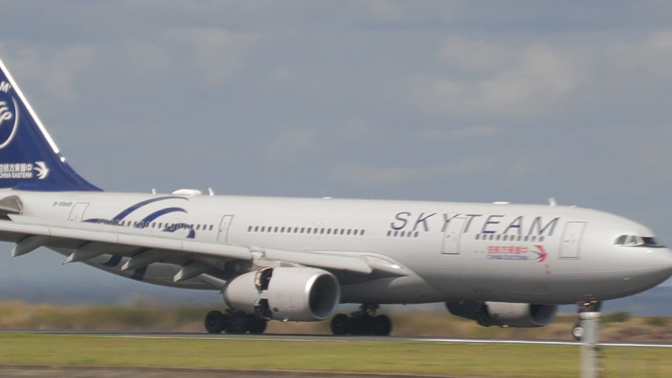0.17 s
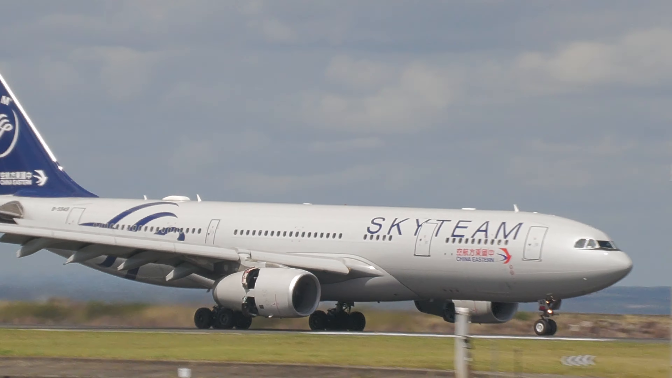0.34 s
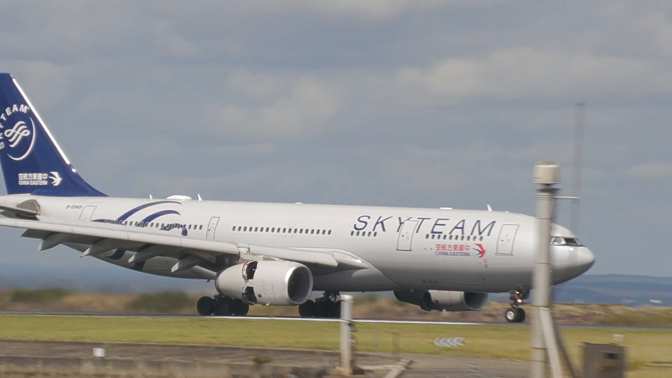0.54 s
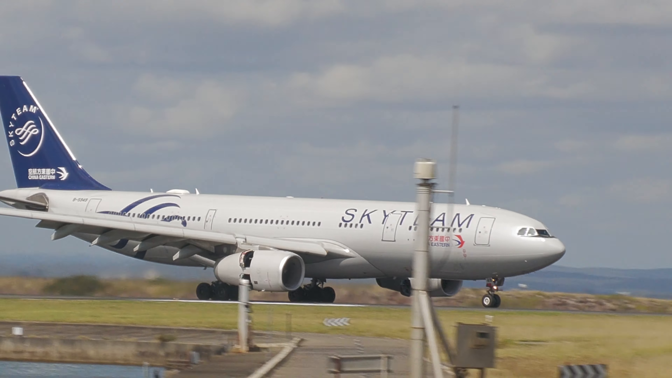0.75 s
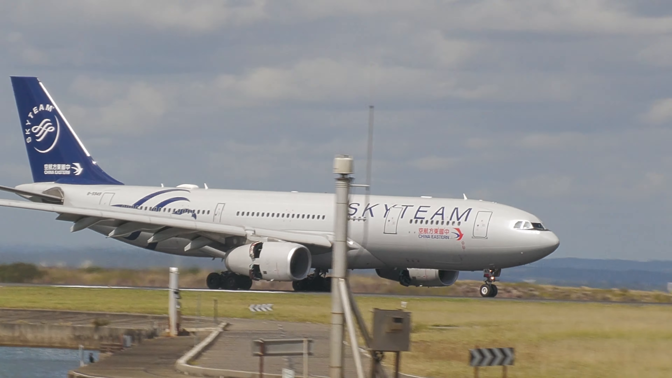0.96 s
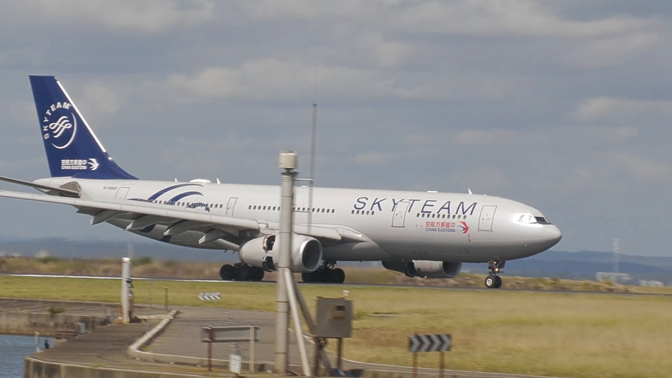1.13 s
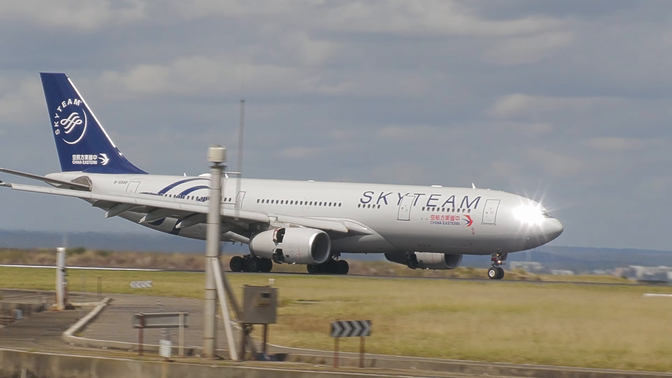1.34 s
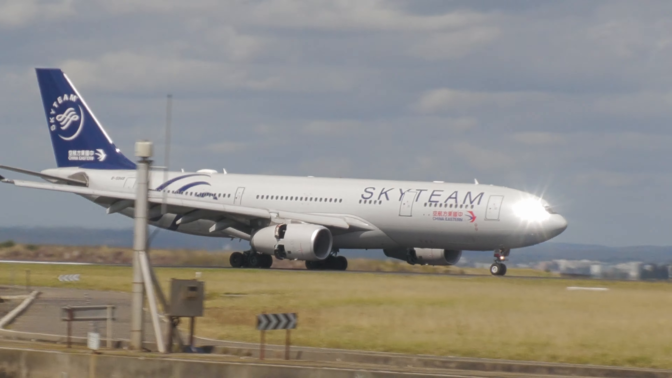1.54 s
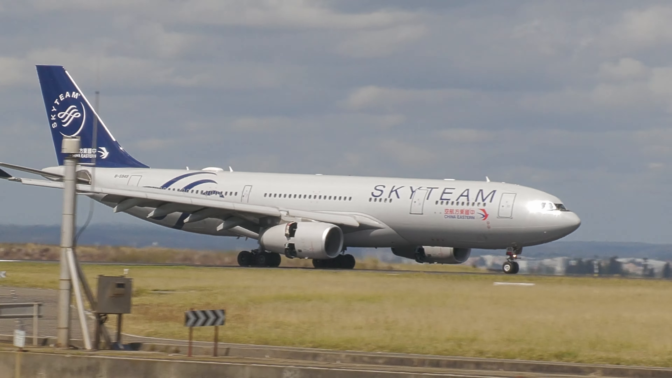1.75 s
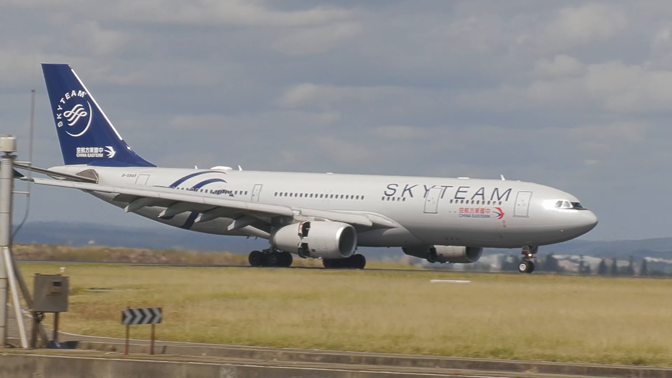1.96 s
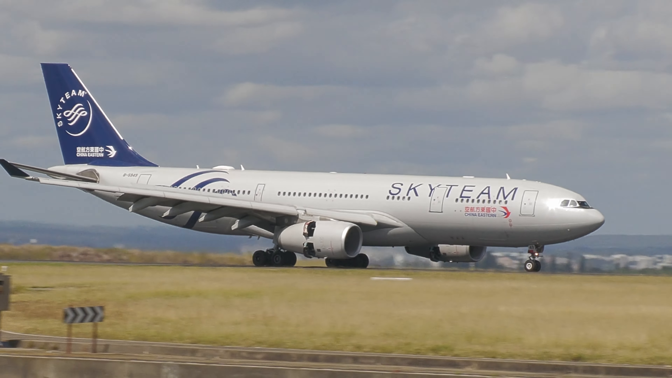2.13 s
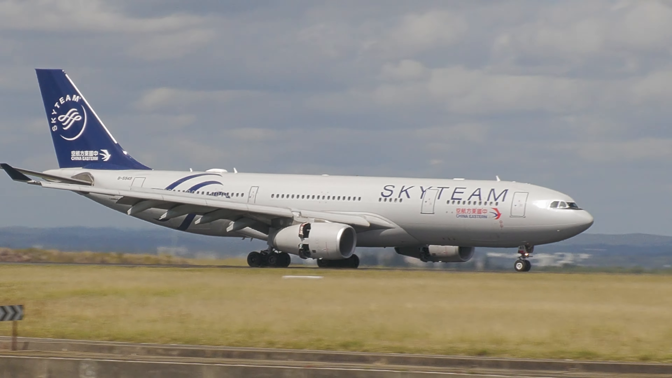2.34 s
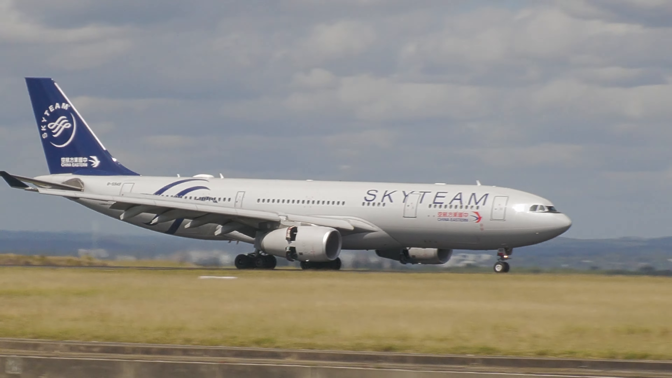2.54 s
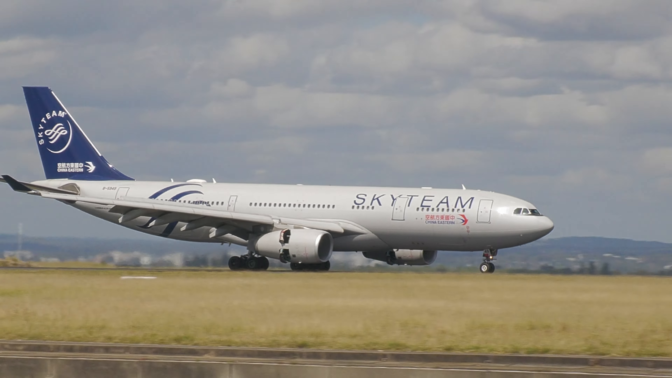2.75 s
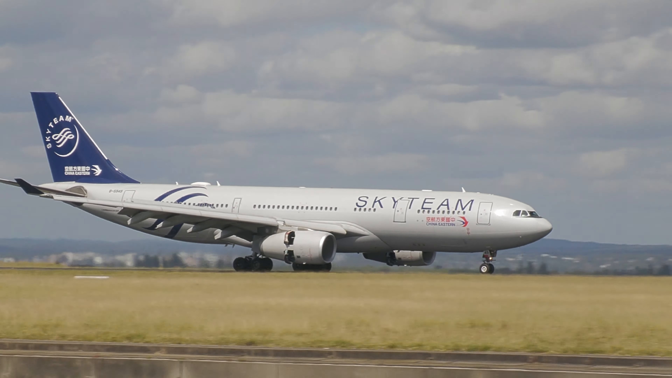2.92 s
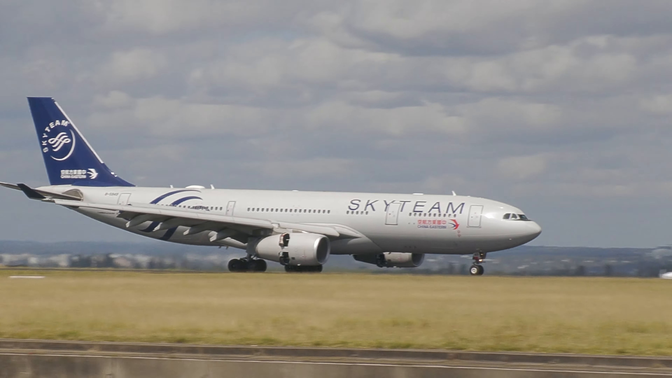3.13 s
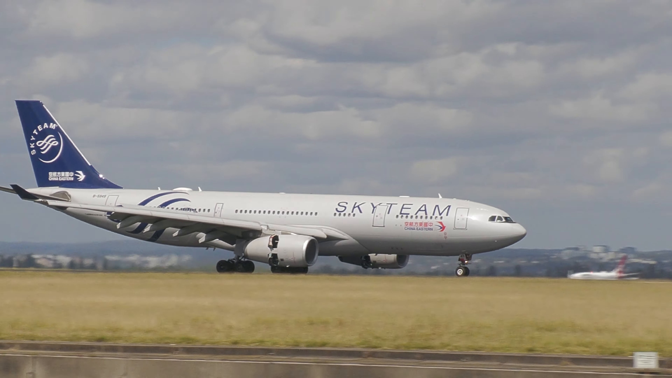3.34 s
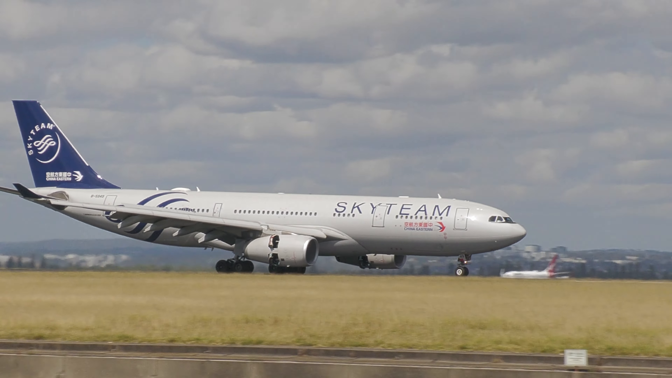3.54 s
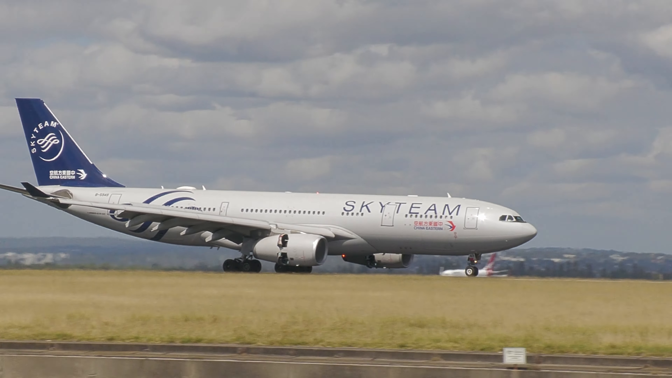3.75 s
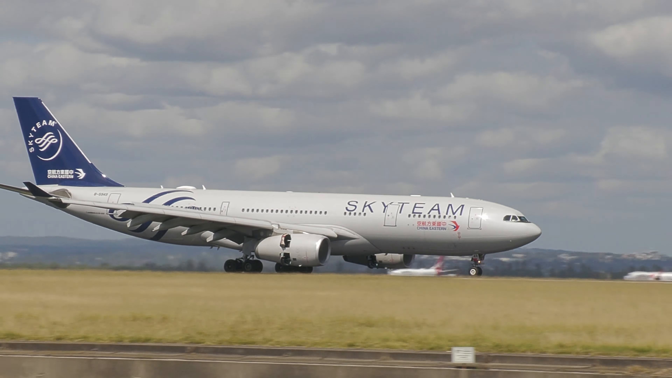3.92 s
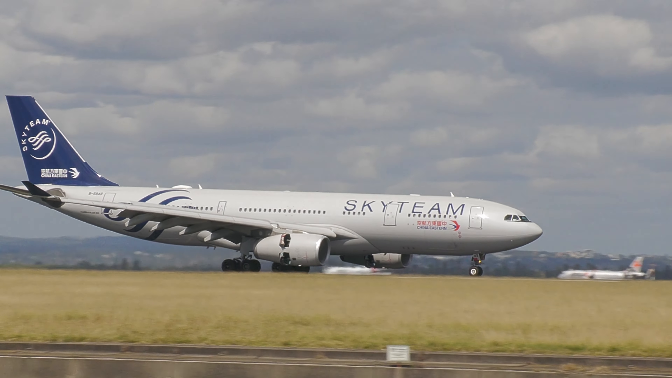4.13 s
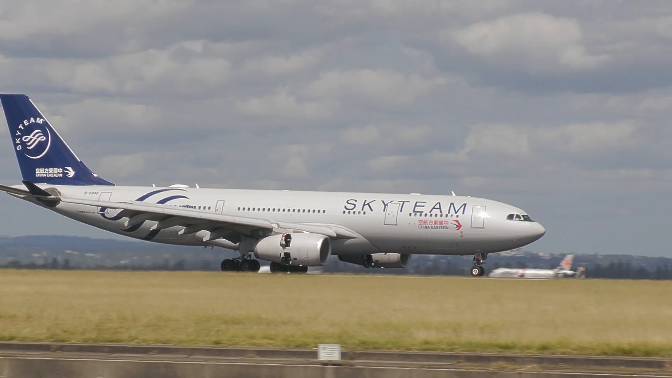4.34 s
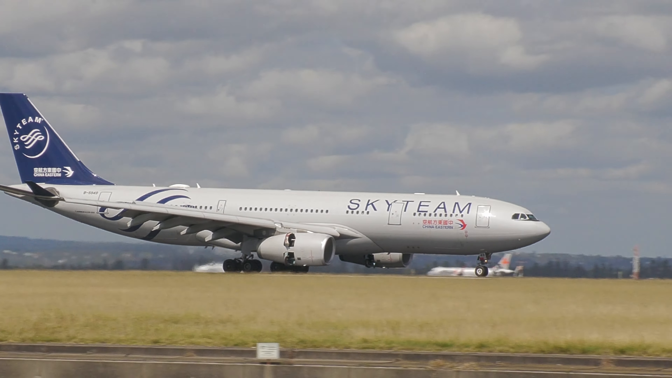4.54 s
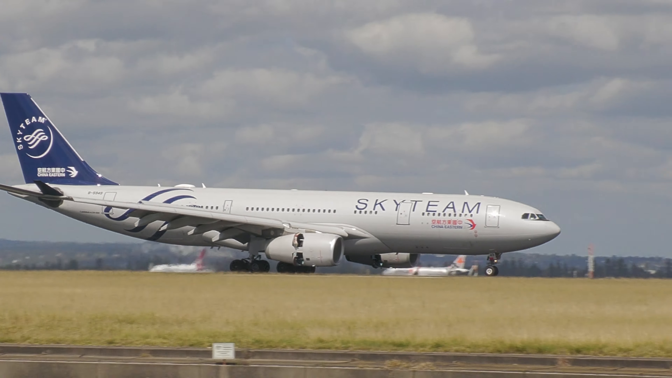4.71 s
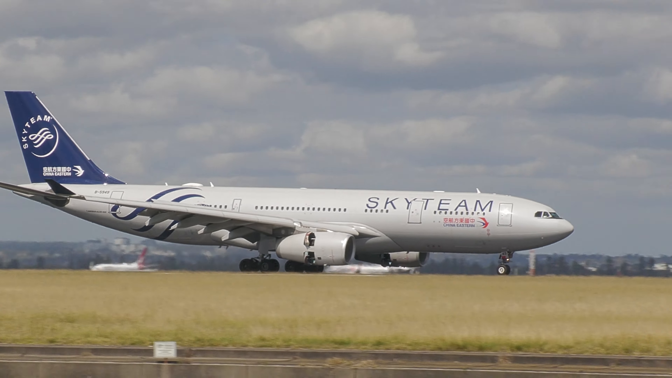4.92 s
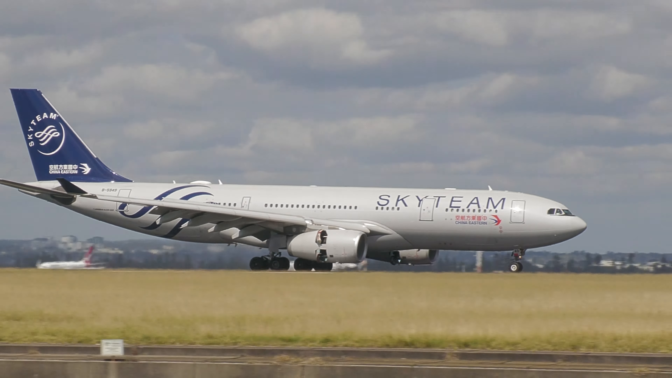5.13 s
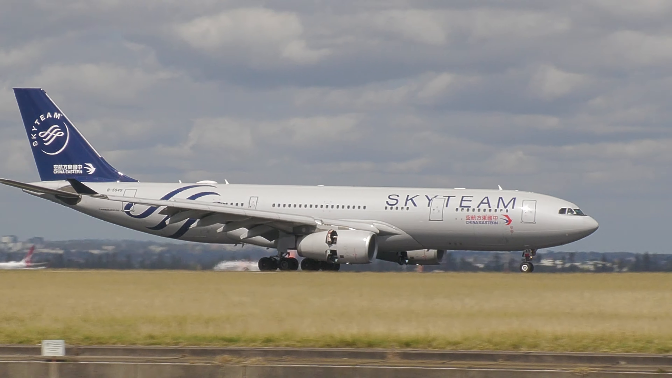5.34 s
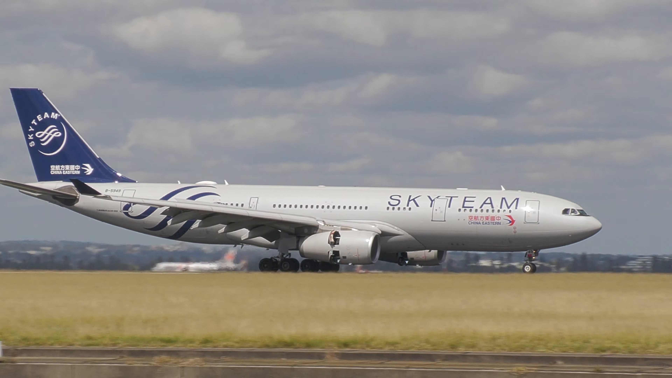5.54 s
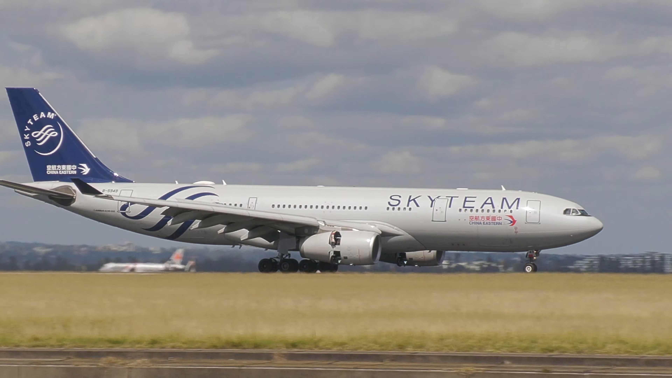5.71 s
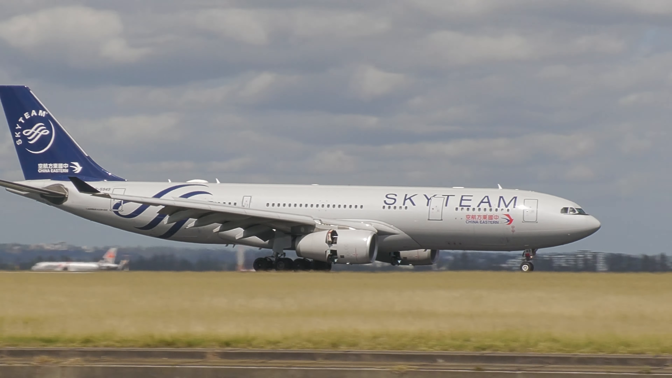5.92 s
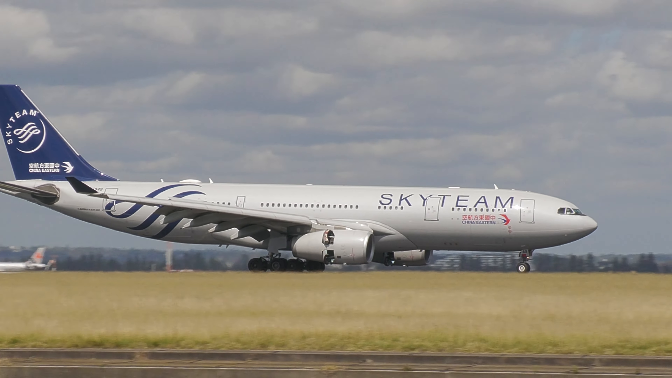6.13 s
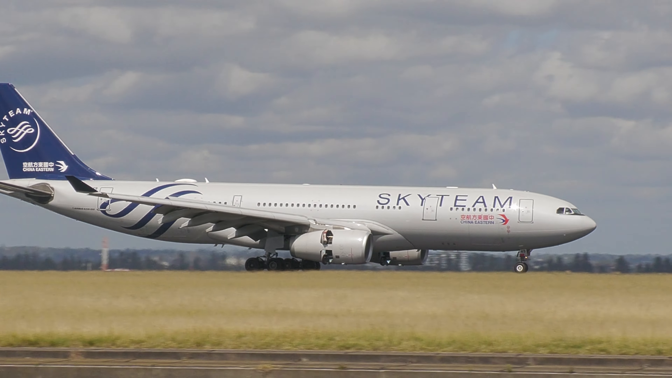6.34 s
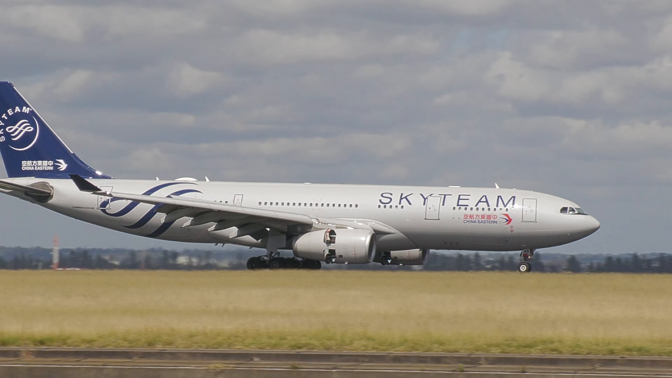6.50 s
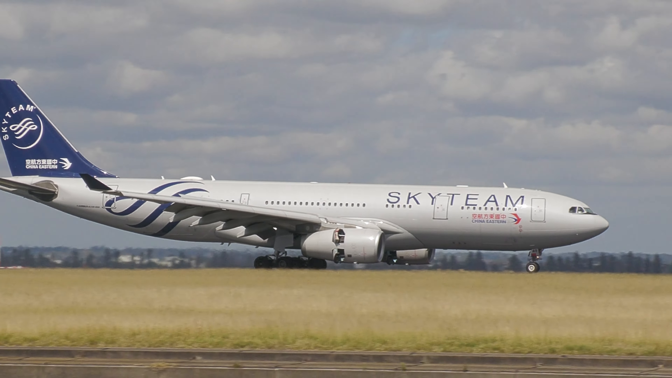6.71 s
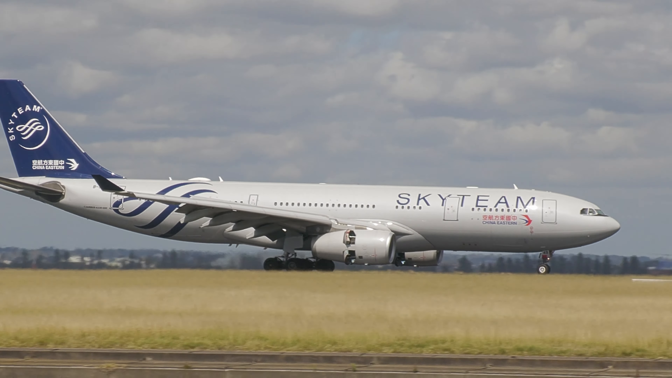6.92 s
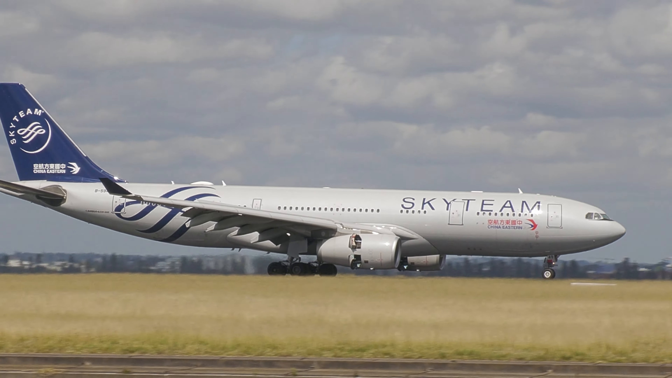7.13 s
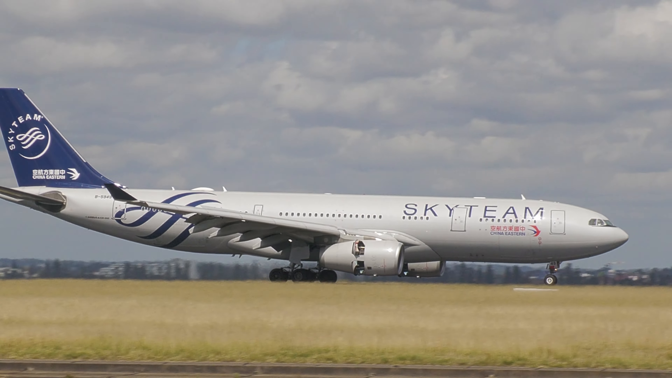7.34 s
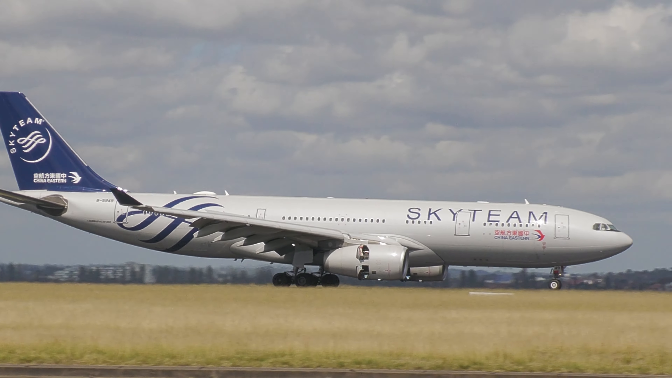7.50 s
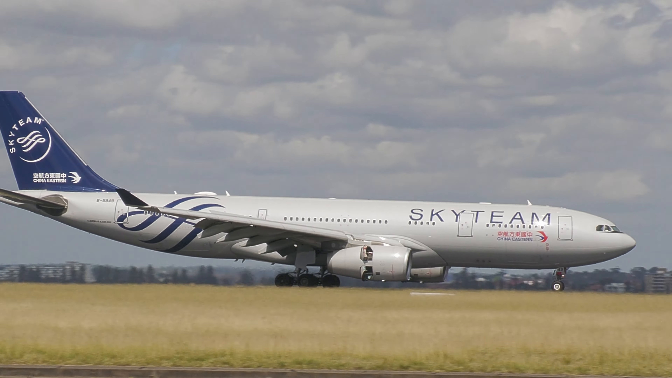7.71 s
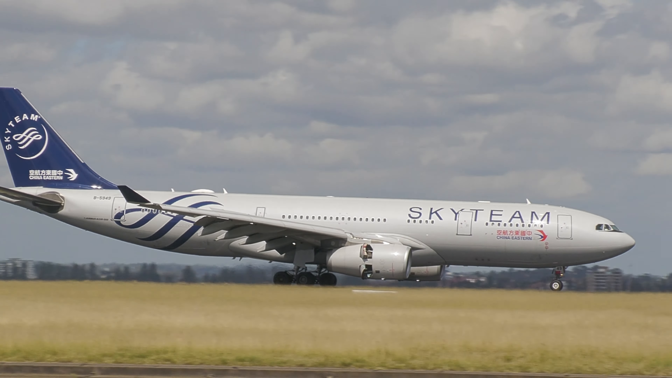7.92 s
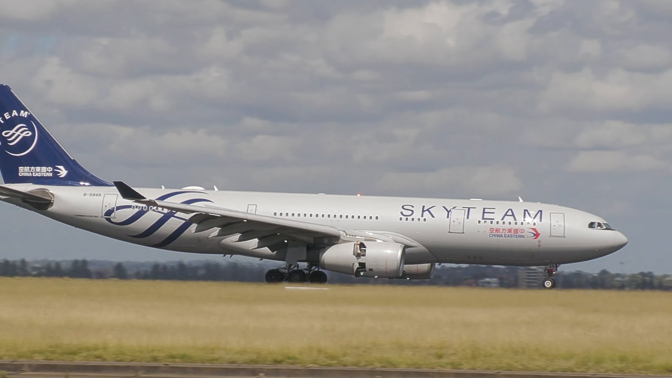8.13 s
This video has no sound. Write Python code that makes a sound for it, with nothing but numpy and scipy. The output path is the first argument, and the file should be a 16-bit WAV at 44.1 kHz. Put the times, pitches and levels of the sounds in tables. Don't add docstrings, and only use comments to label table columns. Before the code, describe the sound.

A large jet rolls along a distant runway with reverse thrust already roaring, deep rumble and dense rushing hiss so loud the microphone input crackles. After under two seconds it drops sharply, then fades through the middle to a faint idle with a soft blurred whine. Open airfield hum remains, light wind buffets the stereo microphone, and a bird gives two small notes on the right near the end.

```python
import sys
import numpy as np
from scipy import signal
from scipy.io import wavfile
from scipy.ndimage import uniform_filter1d

SR = 44100
rng = np.random.default_rng(int(sys.argv[2]) if len(sys.argv) > 2 else 0)


def put_to_file(sound):
    columns = np.atleast_2d(sound).T
    safe = np.clip(columns, -1, 1)
    whole_steps = np.round(safe * 32767)
    wavfile.write(sys.argv[1], SR, whole_steps.astype(np.int16))


def gain_from_db(level_db):
    decades = np.asarray(level_db, float) / 20
    return 10 ** decades


N = 359847
SIZE, HOP = 2048, 512
FRAMES, HZ = N // HOP + 5, np.fft.rfftfreq(SIZE, 1 / SR)
FULL_DB, IDLE_DB = -13, -36

# time in seconds, loudness in dB, tilt of the roar in dB per octave.
JET = [(0, -15, -1), (.3, -13, -3.5), (.55, -13.5, -3), (.75, -14, -0.5), (1.1, -13, -1), (1.25, -12.5, -1),
       (1.55, -12.5, -1.5), (1.72, -17.5, -2.5), (2.1, -19, -1.5), (2.61, -21.5, 0), (3.03, -26, 0.5),
       (3.2, -30, 0), (3.7, -30.5, -1.5), (4.56, -35, -1), (4.8, -38, 0), (5.6, -40, -3), (7.3, -45, -1.5),
       (8.16, -44, -3)]

# frequency in Hz, density in dB per Hz.
FULL_RUMBLE = [(15, -30.5), (30, -27), (50, -17), (65, -17), (95, 0), (122, -4.5), (150, -10.5),
               (190, -22.5), (260, -20.5), (500, -50), (16000, -140)]
IDLE_RUMBLE = [(15, -40), (30, -33), (60, -2.5), (95, 3), (120, -1), (150, -12.5), (190, -13), (260, -45),
               (500, -67), (16000, -140)]
ROAR = [(200, -26.5), (330, -6.5), (480, -1.5), (600, 0), (720, -2.5), (980, 0.5), (1150, -2.5),
        (1400, -1.5), (1650, -6), (2400, -9.5), (5000, -84), (16000, -140)]
FULL_HISS = [(100, -92), (700, -41), (1400, -3), (2000, -1.5), (2900, 1), (4200, -6.5), (5200, -14.5),
             (6100, -24.5), (6600, -30.5), (7200, -41), (8500, -46), (10000, -66), (16000, -89)]
IDLE_HISS = [(100, -87), (700, -38), (1400, -18), (1800, -0.5), (2200, -5.5), (3200, -5.5), (4400, -9),
             (5200, -14.5), (6600, -24), (7200, -33), (8500, -45), (10000, -53), (16000, -77)]
BODY = [(60, -36), (120, -7), (190, 0), (260, -3.5), (330, -6), (480, -13), (620, -23), (1000, -48),
        (2000, -52), (16000, -140)]

# centre in seconds, length in seconds, gain in dB.
RUMBLE_SURGES = [(.35, 0.069, -7.5), (.58, 0.23, 2), (0.905, 0.26, -3.5), (1.377, .15, 1),
                 (1.775, 0.025, 10), (2.065, 0.035, 6.5), (2.15, 0.043, 6), (2.33, .12, 4),
                 (2.58, 0.055, 4.5), (2.684, 0.055, -4), (2.89, 0.024, 5.5), (3.45, .1, 2.5),
                 (3.65, .1, 3.5), (4.403, 0.026, 8.5), (4.8, 0.11, 5), (5.6, .15, -0.5), (6.54, 0.068, 3),
                 (7.412, 0.052, 5), (7.8, .1, 2)]
# centre in seconds, length in seconds, gain in dB.
BODY_SURGES = [(.1, 0.11, -2.5), (.35, 0.086, 1), (.6, 0.09, 1), (1.05, 0.18, -0.5), (1.35, 0.049, 0),
               (1.58, 0.11, -0.5), (1.8, 0.16, 2.5), (2.2, .15, -1.5), (2.7, 0.11, 3), (3.7, 0.57, -3.5),
               (4.15, .1, 6), (7, 0.36, 5)]
# centre in seconds, length in seconds, gain in dB.
CLEAR_AIR = [(.75, .1, -1), (1.3, 0.054, -3.5), (1.8, .2, 0), (2.45, 0.13, -1.5), (2.85, 0.18, 2),
             (3.25, 0.1, -1), (3.55, 0.071, 2), (4.28, .07, 1.5), (4.56, .08, 2), (5.45, 0.097, 1.5),
             (6, 0.18, -1.5), (7.9, 0.82, 2.5)]

# start in seconds, length in seconds, top pitch in Hz, level in dB,
# share of the note before its top.
BIRD_NOTES = [
    (6.77, .09, 1490, -51, .6),
    (6.95, .25, 1865, -50.5, .43),
]

# frequency in Hz, density in dB per Hz.
AIRFIELD = [(20, -7), (60, -1), (120, -3), (180, -11.5), (300, -16.5), (700, -15), (1200, -21),
            (2000, -28.5), (4000, -47.5), (8000, -53.5), (16000, -76)]
WIND = [(10, -15), (30, 1.5), (60, -7), (110, -16), (165, -10), (200, -27), (500, -52), (16000, -140)]
PREAMP = [(100, -6), (6000, 0), (9000, -0.5), (12000, -1), (16000, -5)]
# frequency in Hz, left minus right in dB.
HUM_BALANCE = [(60, 2), (99, 2), (160, 10.5), (270, 3), (440, -1.5), (730, -2), (1200, -5), (1970, -3),
               (3240, -5), (5340, 10)]
# time in seconds, left level in dB, right level in dB.
GUSTS = [(0, -45, -48), (4, -43.5, -51), (5, -37, -50), (6, -38, -44), (6.5, -42, -35), (6.9, -45, -51),
         (7.3, -35, -40), (7.8, -34, -39), (8.16, -35.5, -48)]


def jet():
    left_minus_right_db = 2.5
    sides_db = np.array([[.5], [-.5]]) * left_minus_right_db
    return (rumble() + roar() + hiss() + body() + blades()) * gain_from_db(sides_db)


def rumble():
    gain = follows(full_db=-15, slope=0.75) * surging(RUMBLE_SURGES)
    return gain * noise(spooling(FULL_RUMBLE, IDLE_RUMBLE), patchy_db=.2, swell_db=.2, same=.99)


def roar():
    return follows(full_db=-13, slope=1.057) * noise(tipped(ROAR), patchy_db=.9, swell_db=.5, same=.985)


def hiss():
    gain = follows(full_db=-19.5, slope=0.92) * surging(CLEAR_AIR)
    return gain * noise(spooling(FULL_HISS, IDLE_HISS), patchy_db=.9, swell_db=.3, same=.995)


def body():
    gain = follows(full_db=-13, slope=1.2) * surging(BODY_SURGES)
    return gain * noise(colour(BODY), patchy_db=.3, swell_db=.5, same=.985)


def blades():
    t = np.arange(N) / SR
    down = .5 + .5 * np.tanh((t - 4.45) / 1.1)
    fan_db = shows(top_s=5, top_db=-49.5, rise=1, fall=3)
    fan = whine(1850 - 90 * (t - 5), fan_db, width_hz=240)
    idle_db = shows(top_s=7.5, top_db=-54, rise=23, fall=3)
    idle = whine(1645 - 28 * (t - 7.5), idle_db, width_hz=38)
    turbine_full_hz, turbine_idle_hz = 6500, 4960
    turbine_hz = turbine_full_hz + (turbine_idle_hz - turbine_full_hz) * down
    turbine_db = shows(top_s=4, top_db=-69, rise=9, fall=-0.5)
    return fan + idle + whine(turbine_hz, turbine_db, width_hz=110)


def whine(hz, db, width_hz):
    turn = np.exp(2j * np.pi * np.cumsum(hz) / SR)
    r = np.exp(-np.pi * width_hz / SR)
    slow = rng.standard_normal(N) / turn
    for _ in range(2):
        slow = signal.lfilter([1 - r], [1, -r], slow)
    return gain_from_db(db) * evened((turn * slow).real)


def follows(full_db, slope):
    return gain_from_db(full_db + slope * (curve(JET, count=1) - FULL_DB))


def spooling(full, idle):
    s, loud_db, _ = np.transpose(JET)
    loud_db = np.interp(np.arange(FRAMES) * HOP / SR, s, loud_db)
    thrust = np.clip((loud_db - IDLE_DB) / (FULL_DB - IDLE_DB), 0, 1) ** .4
    power = thrust * gain_from_db(colour(full)) ** 2 + (1 - thrust) * gain_from_db(colour(idle)) ** 2
    return 10 * np.log10(power)


def tipped(spectrum):
    s, _, slope = np.transpose(JET)
    octaves = np.clip(np.log2((HZ + 1) / 900), -2, 2)[:, None]
    bins_db = colour(spectrum) + octaves * np.interp(np.arange(FRAMES) * HOP / SR, s, slope)
    return bins_db - 10 * np.log10(np.sum(gain_from_db(bins_db) ** 2, axis=0))


def surging(rows):
    t = np.arange(N) / SR
    return gain_from_db(sum(db * np.exp(-((t - s) / length) ** 2) for s, length, db in rows))


def shows(top_s, top_db, rise, fall):
    late = np.arange(N) / SR - top_s
    return top_db + np.minimum(rise * late, -fall * late)


def bird():
    t, song = np.arange(N) / SR, np.zeros(N)
    ends_db, climb, fade_s = -11, .1, .012
    for start, length, top_hz, db, late in BIRD_NOTES:
        u = np.clip((t - start) / length, 0, 1)
        gate = np.clip(np.minimum(u, 1 - u) * length / fade_s, 0, 1)
        arch = (u / late * np.exp(1 - u / late)) ** 2
        hz = top_hz * (1 - climb + climb * arch)
        level = gain_from_db(db + ends_db * (0.5 - np.sin(np.pi * u)))
        song += gate * level * np.sqrt(2) * np.sin(2 * np.pi * np.cumsum(hz) / SR)
    return song * np.array([[-gain_from_db(-6)], [1]])


def airfield():
    hz, lean_db = np.transpose(HUM_BALANCE)
    sides_db = np.outer([.5, -.5], np.interp(HZ, hz, lean_db))[:, :, None]
    level_db = shows(top_s=2.3, top_db=-32.5, rise=0.9, fall=0.9)
    return gain_from_db(level_db) * noise(colour(AIRFIELD) + sides_db, patchy_db=-0.14, swell_db=0.7, same=0.062)


def wind():
    level_db = np.array([curve(GUSTS, count=1), curve(GUSTS, count=2)])
    return gain_from_db(level_db) * noise(colour(WIND), patchy_db=-2.5, swell_db=0.0, same=.1)


def preamp():
    return gain_from_db(-71) * noise(colour(PREAMP), same=.05)


def noise(bins_db, patchy_db=0., swell_db=0., same=1.):
    a, b, c, d, patches = rng.standard_normal((FRAMES, len(HZ), 5)).T
    patches = uniform_filter1d(patches, size=20, axis=0)
    patches = evened(uniform_filter1d(patches, size=8, axis=1))
    flutter = evened(uniform_filter1d(rng.standard_normal(FRAMES), size=3))
    left = a + 1j * b
    right = same * left + np.sqrt(1 - same ** 2) * (c + 1j * d)
    z = np.array([left, right]) * gain_from_db(bins_db + patchy_db * patches + swell_db * flutter)
    return evened(signal.istft(z, nperseg=SIZE, noverlap=SIZE - HOP)[1][:, :N])


def colour(spectrum):
    hz, db = np.transpose(spectrum)
    bins_db = np.interp(np.log(HZ + 1), np.log(hz + 1), db)[:, None]
    return bins_db - 10 * np.log10(np.sum(gain_from_db(bins_db) ** 2))


def curve(rows, count):
    rows = np.asarray(rows)
    return np.interp(np.arange(N) / SR, rows[:, 0], rows[:, count])


def evened(x):
    return x / np.sqrt(np.mean(x ** 2) + 1e-20)


def scene():
    return jet() + bird() + airfield() + wind()


def roll_off(x):
    return signal.sosfilt(signal.butter(12, 15770, fs=SR, output="sos"), x)


def record(dry):
    ceiling = 0.68
    mix = np.clip(dry + preamp(), -ceiling, ceiling)
    return roll_off(mix)


dry = scene()
out = record(dry)
put_to_file(out)
```